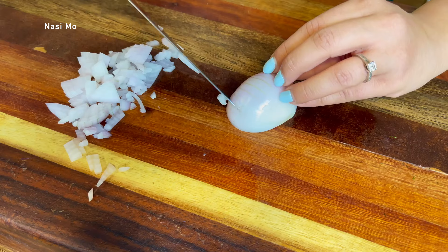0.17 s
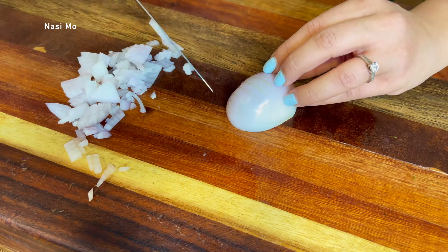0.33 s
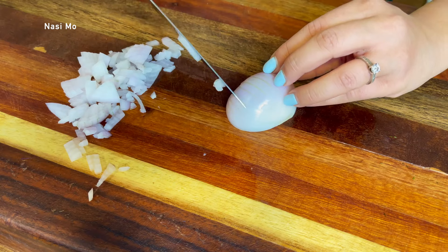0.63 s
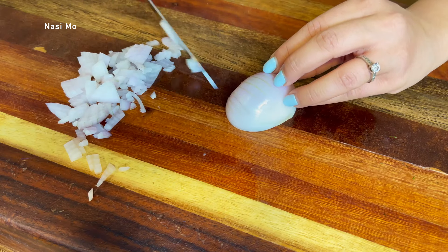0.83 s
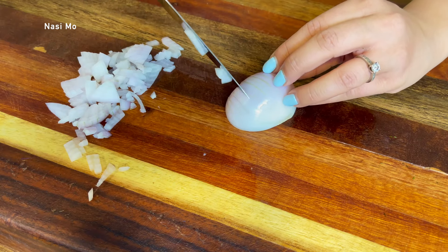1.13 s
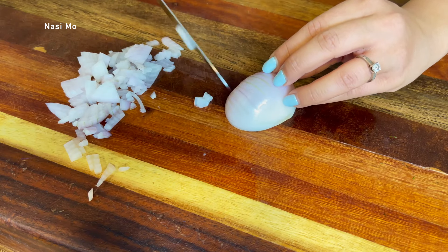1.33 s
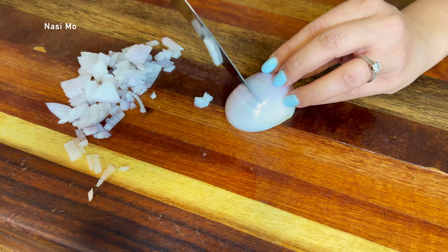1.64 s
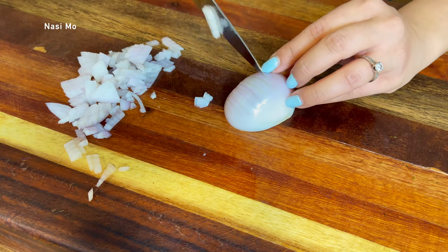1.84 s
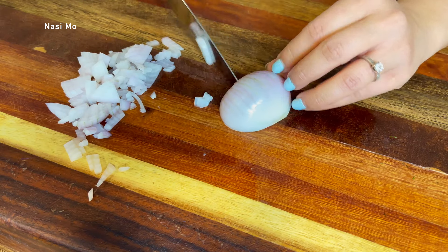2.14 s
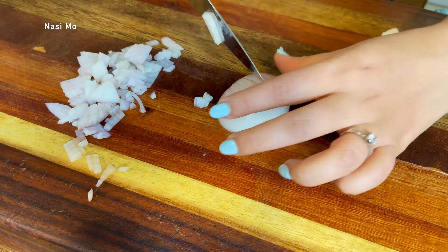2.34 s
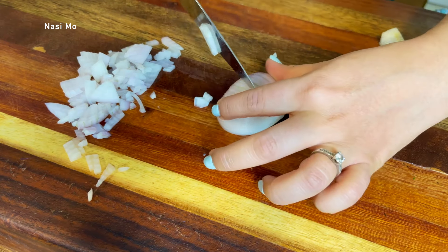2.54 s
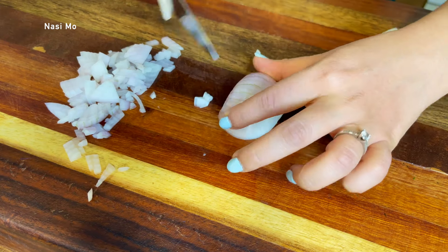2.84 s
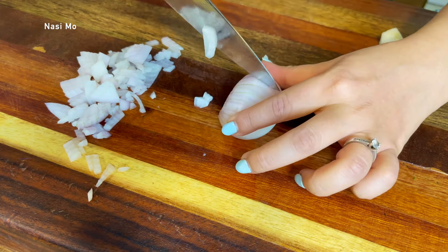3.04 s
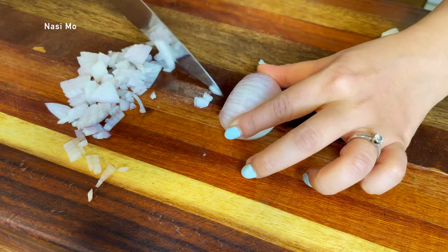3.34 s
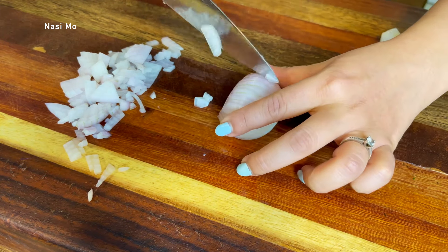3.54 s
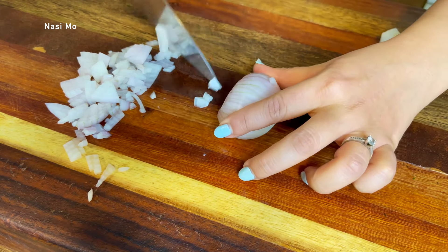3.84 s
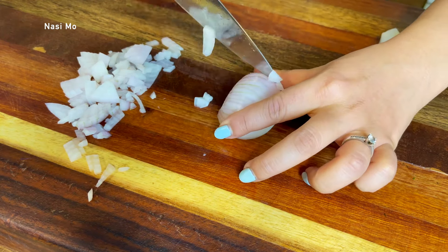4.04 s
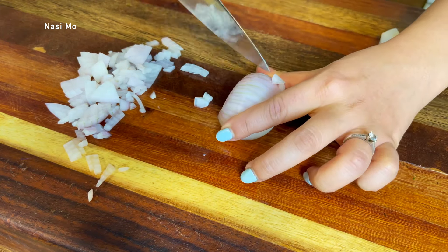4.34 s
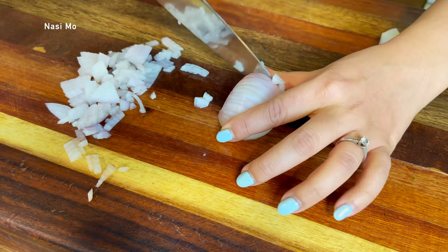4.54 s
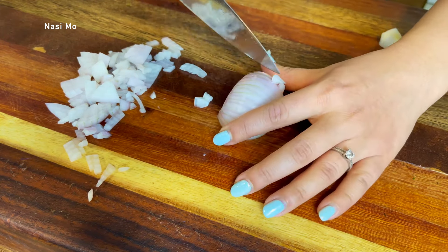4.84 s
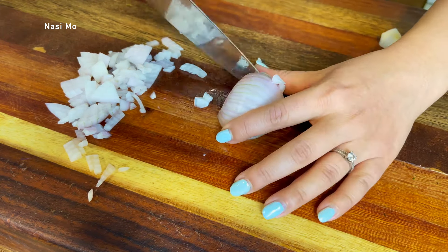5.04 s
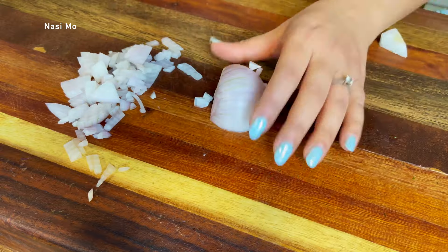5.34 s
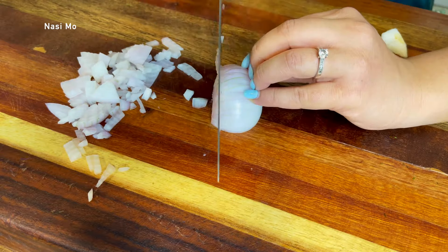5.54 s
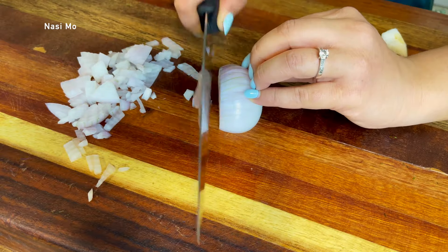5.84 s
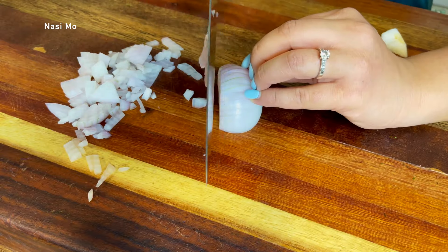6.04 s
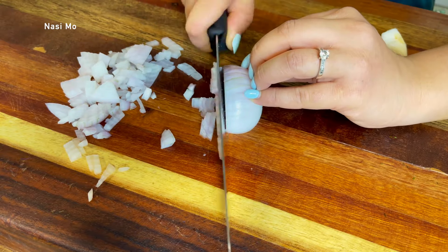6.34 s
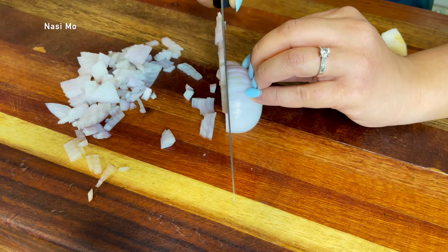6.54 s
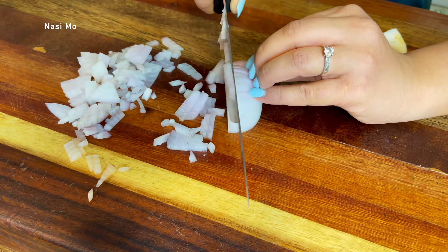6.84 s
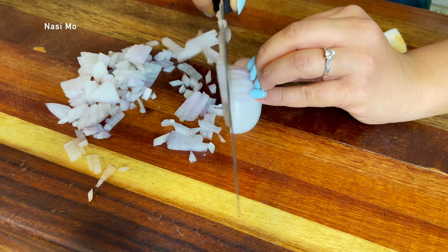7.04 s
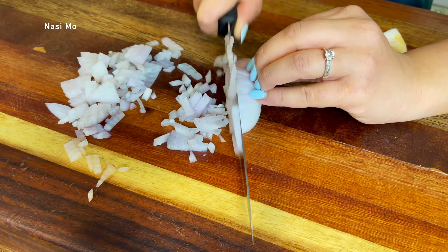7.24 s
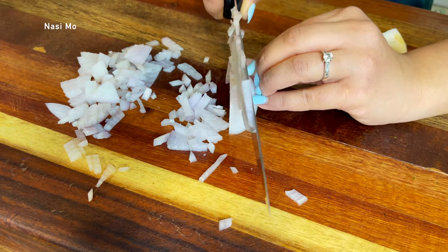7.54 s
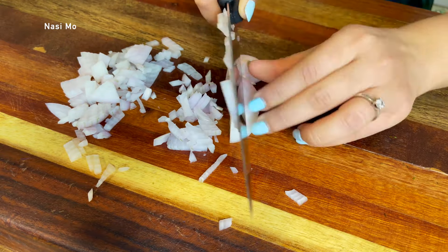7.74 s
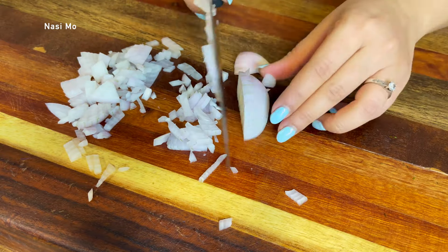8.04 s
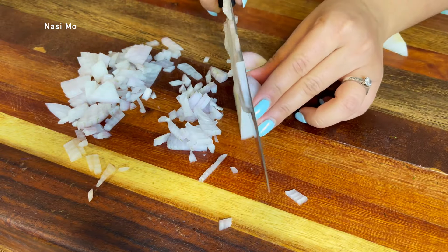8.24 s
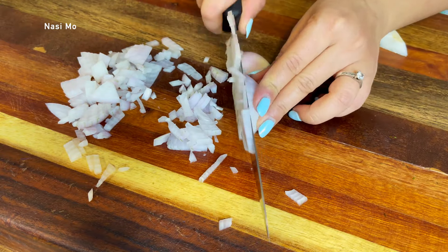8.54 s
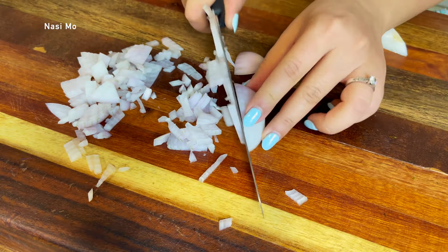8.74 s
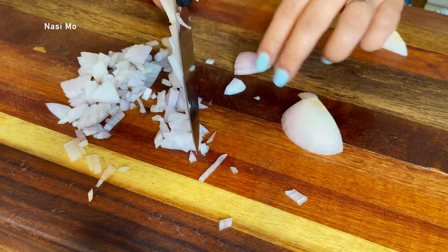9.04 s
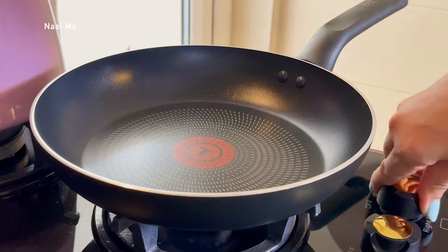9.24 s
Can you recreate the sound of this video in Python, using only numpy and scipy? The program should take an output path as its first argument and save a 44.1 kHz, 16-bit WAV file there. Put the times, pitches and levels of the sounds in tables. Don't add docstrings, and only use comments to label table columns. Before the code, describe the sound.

Very close to a wooden board in a home kitchen, a knife crunches through an onion and cracks onto the wood about every half second, with low counter thumps. After a short pause it dices in a quicker run, then slows to a few soft contacts. Finally a gas hob igniter snaps four times under a pan, with soft hissing gas.

```python
import sys
import numpy as np
from scipy import signal
from scipy.fft import rfft, irfft, next_fast_len
from scipy.io import wavfile
from scipy.ndimage import uniform_filter1d, map_coordinates

SR = 44100
rng = np.random.default_rng(int(sys.argv[2]) if len(sys.argv) > 2 else 0)


def dump(signal):
    limited = np.clip(np.atleast_2d(signal).T, -1, 1)
    pcm = np.round(limited * 32767).astype(np.int16)
    wavfile.write(sys.argv[1], SR, pcm)


def volts_from_decibels(level):
    exponent = np.asarray(level, float) / 20
    return 10 ** exponent


N = 414540

# start in seconds, peak, low knock, middle knock and crack in dB.
BLOWS = [(0.0776, -11, -4.5, -11, -7), (0.2473, -17.5, -5, -4.5, -9), (0.749, -16.5, -9.5, -4, -5.5),
         (1.271, -16.5, -6.5, -2.5, -8.5), (1.69, -14, -2.5, -9, -5.5), (2.0666, -8, -7.5, -14, -6),
         (2.7004, -15.5, -1, -4, -7.5), (3.239, -10, 3, -9, -8.5), (3.719, -18, 2, -5, -6),
         (4.161, -24, 7, -1, -4), (4.6219, -15.5, -3.5, -8.5, -6.5), (5.77, -20.5, -5, -7.5, -12),
         (6.2937, -20, -1, -7.5, -13), (6.6128, -12.5, -4, -14, -6), (6.924, -12.5, -5.5, -11.5, -13.5),
         (7.273, -13.5, -6, -20, -17.5), (8.5984, -19.5, -0.5, -10, -33)]
PLATE_DB = [0.5, -2.5, -0.5, -4.5, 1.5, 0, -0.5, 0, -12.5, -8, -4, -12, -7, -2, -1.5, 10.5, 5]
TAIL_DB = [1.6, 0.81, 1.3, .6, 0.78, 1.1, 1.3, 0.98, 1.4, 0.37, 0.16, 0.66, 0.14, 2.8, -1.1, -0.73, 1.2]
TOP_DB = [-6.5, 7, 10.5, 9, -3.5, -4.5, 3, -1.5, 0, 4, -4, -11, -17, -13, -10, -6, -3]
BITE_DB = [-1.5, -3, -.6, -0.4, 1.8, -2.5, 0.1, -0.7, 4.2, 2.5, -1, 1.7, 1.8, 0.5, -1, 0.85, 3.5]
DEEP_DB = [-0.3, 3.8, 8.5, -5, 1.5, -1.2, -1.3, -6.5, -7, -3, -8.2, 5, -6, 2.8, 7, 2.5, 1]
EDGE_KNOCK_DB = [-39, -59]

# pitch in Hz, level in dB, decay t60 in seconds.
LOW = [(196, -16, 0.17), (347.6, 3, 0.062), (375.5, 1.5, 0.063)]
# pitch in Hz, level in dB, t60 in seconds.
MIDDLE = [(575, -5, .035), (711, -11, .05), (892, -7, .05), (1426, -2, .14), (1680, -12, .06),
          (1803, -13, .08)]
# pitch in Hz, level in dB, t60 in seconds.
BRIGHT = [(2690, -5, .026), (2760, -3, .055), (2965, -1.5, .035), (3035, -16, .09), (3205, -12, .08),
          (3257, -14, .09), (3360, -11, .13), (3405, -14, .15), (3480, -13, .13), (3634, -12, .07),
          (3720, -13, .1), (4160, -22, .07), (4730, -24, .07), (5400, -30, .06)]
# pitch in Hz, level in dB, t60 in seconds.
EDGE = [(1000, -8, .04), (1144, -6, .12), (1176, 0, .12)]
# pitch in Hz, level in dB, t60 in seconds.
BETWEEN = [(920, -2, 0.032), (1800, -1.5, 0.02), (2110, -7, 0.027), (2330, -11, 0.094), (2640, -8.5, 0.022),
           (3880, -8.5, 0.066), (4364, -10, .03), (5410, -10, 0.013), (5660, -16.5, 0.036)]
PLATE_BEAT_HZ, PLATE_STEADY = 16.5, 0.32
CONTACT_S, DAMP_S, LEFT_DB = .0052, .0012, -8
TAIL_END_S, TAIL_END_DB = 0.172, -15.5

# frequency in Hz, level in dB per Hz.
ROOM_COLOUR = [(100, -12.5), (300, 0), (600, -9.5), (2000, -2), (3500, -1), (4200, -9), (6000, -1.5),
               (9000, -20), (16000, -28.5)]
# frequency in Hz, t60 in seconds.
ROOM_DECAY = [(200, 0.49), (1000, 0.21), (3000, 0.24), (7000, 0.12), (14000, 0.53)]

# start in seconds, then low, middle, edge and bright modes in dB.
RESTS = [
    (3.718, -44, -55, -33, -74.5),
    (4.163, -58, -44, -33.5, -77),
    (5.0467, -40.5, -64, -40, -48),
    (5.444, -94, -74, -82.5, -70.5),
    (5.77, -66, -61, -43, -70),
    (7.758, -46, -49, -65.5, -66),
    (8.442, -65, -47.5, -75, -75),
    (8.863, -53, -61, -81, -76),
]

# start in seconds, crunch in dB, rise in seconds,
# fall in seconds, board murmur in dB.
SCORING = [(.015, -42.5, 0.012, 0.016, -2.5), (0.059, -41.5, 0.0068, .2, 1.5),
           (.183, -43.5, 0.0052, 0.059, -6.5), (0.699, -60.5, 0.038, 0.051, -2.5),
           (0.746, -44.5, 0.021, .05, -2.5), (1.25, -56, 0.059, 0.084, -1), (1.266, -40, 0.0082, .05, -6),
           (1.64, -52, 0.011, 0.31, -1.5), (1.68, -53.5, 0.091, .1, -7), (2.0, -47, 0.017, 0.031, 2.5),
           (2.063, -45.5, 0.013, 0.081, 3), (2.677, -43, 0.018, 0.08, -1),
           (3.101, -60.5, 0.028, 0.082, 1.5), (3.154, -58.5, 0.079, 0.019, 4.5),
           (3.238, -47.5, 0.013, 0.094, -1.5), (3.654, -44.5, 0.022, 0.034, 0), (3.71, -56.5, 0.11, .1, -2),
           (4.108, -68.5, 0.024, 0.12, 5.5), (4.123, -52, 0.0068, 0.43, 3.5),
           (4.55, -55.5, 0.028, 0.22, -13), (4.575, -61, 0.093, 0.029, 8.5), (4.97, -65, 0.017, 0.13, -1),
           (5.006, -63, 0.0098, 0.2, 3.5), (5.035, -52, 0.081, 0.027, -6)]
# start in seconds, crunch in dB, rise and fall in seconds, murmur in dB.
DICING = [(5.729, -57.5, 0.031, 0.19, 3), (5.764, -43, 0.048, .1, -1), (6.26, -48, 0.025, 0.59, 1.5),
          (6.552, -55.5, 0.032, 0.061, 2), (6.607, -38, 0.031, 0.12, -8), (6.9, -39.5, 0.0067, 0.24, 1.5),
          (6.917, -46, 0.047, 0.11, -14), (7.201, -60.5, 0.029, 0.032, 6), (7.245, -42, 0.02, 0.083, -1),
          (8.442, -69.5, 0.013, 0.025, 16.5), (8.467, -75, 0.018, 0.035, 10),
          (8.482, -60.5, 0.024, 0.83, 1.5), (8.554, -55, 0.0051, 0.28, -3), (8.591, -64, 0.043, 0.13, -8)]
FINE_DB = [-.6, -0.24, -.6, 2.4, 1.5, 0.41, 1.7, -1.5, -1.5, -1.7, -1.5, -0.47, -0.57, -0.81, -1.4, -.6,
           -.6, -0.47, -0.16, -1.5, -1.5, 1.5, 1.8, 1.5, 0.48, 0.47, 1.2, -.6, 0.41, -0.42, -.6, -.6, -0.24,
           -0.49, -.6, -0.17, -0.31, -1.5]
# frequency in Hz, level in dB per Hz.
CRUNCH = [(1760, -40), (3000, -11.5), (3400, 4), (4630, 5), (6260, 4), (6810, -1), (10100, 0), (15000, 1.5),
          (16000, -23.5)]
BURST_DB, MURMUR_SWING, LOW_MURMUR_DB = 25.5, 0.78, 2.5
PATCHY_DB = 5
# pitch in Hz, level in dB, t60 in seconds.
CUT_MODES = [(1424, -0.5, 0.11), (1720, -10, .04), (1125, -13.5, 0.034)]
# frequency in Hz, level in dB per Hz.
FINE_MURMUR = [(1800, -31.5), (2600, 5.5), (3800, -8.0), (4500, -37.0)]

# start in seconds, peak in dB, board in dB.
TICKS = [(0.002, -57, -20), (0.496, -43.5, -26), (0.6432, -47.5, -29), (0.6879, -47, -34),
         (0.859, -39.5, -21), (1.2247, -51, -26), (1.365, -37, -15), (1.6325, -37, -32),
         (1.6591, -25.5, -27), (1.981, -37, -14), (2.8204, -37.5, -15.5), (3.1, -37.5, -29),
         (3, -56, -13.5), (3.7, -49, -26.5), (3.637, -34, -14), (4.2588, -33, -20), (4.544, -37, -27),
         (4.709, -35.5, -34), (4.907, -51, -28.5), (4.968, -49, -16), (4.987, -48, -32), (5.005, -45, -31),
         (5.0241, -52, -33), (5.046, -31, -18), (5.1935, -39, -34), (5.7157, -48.5, -26.5),
         (5.9659, -57, -7.5), (5.993, -54, -28.5), (6.499, -48, -5.5), (6.68, -51, -29),
         (6.815, -40, -11.5), (6.845, -39, -20), (7.202, -44, -25), (7.519, -41, -22), (7.81, -64, -29),
         (8.439, -43.5, -13.5), (8.462, -44, -25.5), (8.554, -33, -26), (8.567, -42, -25),
         (8.815, -54.5, -5.5), (8.867, -61, 1)]
# start in seconds, low modes in dB, deepest mode in dB.
NUDGES = [(0.02, -31, -37), (0.081, -44, -21.5), (0.194, -52, -50), (1.514, -49.5, -71.5), (1.64, -45, -58),
          (1.902, -49, -71), (1.986, -46, -60), (2.684, -34.5, -58), (3.024, -34, -64), (3.136, -57, -66),
          (3.337, -38, -63), (3.557, -43, -71.5), (3.641, -27, -61), (3.817, -35, -68.5), (3.995, -38, -64),
          (4.124, -30, -53), (4.257, -34, -45), (4.552, -33, -62), (4.712, -38, -63.5), (5.198, -40, -78.5),
          (5.727, -37.5, -57), (5.97, -43.5, -60), (6.267, -42.5, -54), (6.899, -37, -51),
          (7.003, -51, -62), (7.683, -45, -77), (8.442, -41, -28.5), (8.464, -33, -27.5)]
# start in seconds, pitch in Hz, level in dB, t60 in seconds.
FAINT = [(5.436, 1860, -78, 0.22), (5.44, 2646, -68, 0.23), (5.452, 2290, -76.5, 0.26),
         (5.46, 3300, -79, 0.13), (7.59, 3190, -72.5, 0.095), (7.78, 1424, -71.5, 0.91),
         (7.8, 2815, -70, 0.16), (5.63, 300, -70, 0.53), (5.63, 620, -76.5, 0.37), (7.87, 2900, -75.5, 0.4),
         (8.005, 765, -83.5, 0.46), (8.155, 300, -71.5, 0.28), (8.255, 740, -81.5, 0.64),
         (8.868, 1420, -61, 0.065), (8.88, 201, -60, 0.21)]
# start in seconds, pitch in Hz, level in dB, t60 in seconds.
BLIPS = [
    (8.438, 3040, -57.5, .03),
    (8.441, 5400, -69, .03),
    (8.771, 3000, -52, .025),
    (8.812, 5500, -61, .04),
    (8.865, 2860, -51, .015),
    (9.117, 5440, -59.5, .04),
    (9.13, 5370, -52, .05),
]

# start in seconds, level in dB, pitch in Hz, hold in seconds.
JOLTS = [(0.082, -23, 66.64, 0.041), (0.243, -33, 68.33, 0.021), (0.757, -23, 65.92, 0.051),
         (1.283, -23, 67.48, 0.046), (1.699, -23.5, 66.27, 0.039), (2.089, -18.5, 65.62, 0.022),
         (2.702, -27, 67.05, 0.048), (3.26, -17.5, 68.09, 0.033), (3.728, -18.5, 66.77, 0.022),
         (4.164, -24.5, 74.42, 0.047), (4.622, -28.5, 71.67, 0.018), (5.058, -25.5, 65.1, 0.018),
         (5.82, -24.5, 70.1, 0.016), (6.317, -23, 70.4, 0.025), (6.627, -26, 74.03, 0.032),
         (6.918, -22.5, 69.55, 0.018), (7.277, -30.5, 74.4, 0.021), (8.592, -30.5, 70.5, 0.0066)]
# start in seconds, level in dB, pitch in Hz, hold in seconds.
LEANS = [(0, -30, 70, .002), (0.053, -26.5, 68.83, 0.0093), (1.082, -55, 69.83, 0.037),
         (1.556, -44.5, 68.4, 0.0054), (1.667, -26, 69.2, 0.0066), (1.841, -43, 66.56, 0.1),
         (2.014, -23.5, 67.12, 0.029), (2.688, -32, 66, 0.0082), (3.029, -48.5, 72.53, 0.015),
         (3.116, -31, 71.5, 0.07), (3.572, -45.5, 76.7, 0.015), (3.672, -23.5, 69.4, 0.038),
         (3.799, -28.5, 69.1, 0.033), (4.0, -45, 80, 0.025), (4.141, -31.5, 75.23, 0.0051),
         (4.569, -30, 72.35, 0.084), (4.83, -54, 69.22, 0.079), (5.52, -48.5, 77.3, 0.0096),
         (5.62, -41, 82.9, 0.014), (5.742, -22, 75.4, 0.0058), (5.998, -44, 85.85, 0.043),
         (6.131, -46.5, 82.2, .01), (6.513, -27, 73.66, 0.022), (6.829, -32, 74.1, 0.052),
         (7.14, -27, 69, 0.0051), (7.21, -40, 68.7, 0.0088), (7.5, -38, 72.4, 0.12),
         (8.226, -48, 79.5, 0.0097), (8.472, -30.5, 86.2, 0.0073), (8.779, -51.5, 76.2, 0.019)]
SWELL_DB_PER_S, DROP_DB_PER_S, LINGER_DB, LINGER_DB_PER_S = 897, 330.5, -18.5, 91.5
LIFT_S, LIFT_DB, LIFT_HOLD_S = 0.1, -17.5, 0.063
CREST_S, RESET_S = .0255, .014
# pitch in Hz, level in dB, t60 in seconds.
FLUTTER = [(92, 0, .09), (120, -5, .09)]

HOB_S = 9.11
# start in seconds, peak in dB.
SPARKS = [
    (9.152, -18),
    (9.2195, -17),
    (9.287, -17),
    (9.3536, -17.5),
]
# delay in seconds, level in dB.
SPARK_ECHOES = [
    (.0017, 0),
    (.0062, -5.5),
]
# frequency in Hz, level in dB per Hz.
SPARK_COLOUR = [(400, -69), (600, -17), (850, -63), (1190, -17), (1700, -51), (2200, -20), (4000, -17.5),
                (6400, -8), (7900, -15.5), (9900, 1.5), (13300, -2), (16000, -5)]
# pitch in Hz, level in dB, t60 in seconds.
SNAP = [(6000, -11, 0.0083), (6690, -7.5, 0.0095), (8200, -8.0, 0.0049), (10150, -2.5, 0.0057),
        (13300, 8, 0.0027)]
# frequency in Hz, t60 in seconds.
PAN_DECAY = [(500, 0.27), (3000, 0.174), (15000, 0.045)]
# pitch in Hz, level in dB, t60 in seconds.
PAN = [(603, -37, 0.27), (1165, -18, 0.027), (1850, -37.5, 0.14), (2180, -29.5, 0.078), (2720, -23, 0.041),
       (3100, -25, 0.074), (3830, -29, 0.15), (4440, -20, 0.051), (4460, -27, 0.05)]
# time in seconds, hob rumble in dB, gas in dB.
GAS = [
    (9.112, -78, -93.5),
    (9.119, -52, -71),
    (9.18, -47.5, -56),
    (9.195, -56, -60),
    (9.24, -59.5, -59),
    (9.4, -74, -58),
]
# pitch in Hz, level in dB, t60 in seconds.
HOB_MODES = [(201, -4.0, 0.057), (241.4, -4.0, 0.09)]

# frequency in Hz, level in dB per Hz.
HUM = [(45, -34), (80, 13.5), (150, -11.5), (183, -32.5), (296, -2), (403, -5.5), (567, -39), (627, -19.5),
       (874, -17.5), (950, -25), (1240, -46), (2090, -120)]
# frequency in Hz, level in dB per Hz.
HISS = [(500, -44), (700, -13.5), (2000, -1.5), (3500, -6), (4200, -8), (5500, -5.5), (6500, -38)]
HUM_DB, HISS_DB = -54, -70.5
# pitch in Hz, level in dB, t60 in seconds.
HISS_PLATE = [(1424, -2.0, 0.7), (1110, -7.0, 0.075), (1680, -11.0, .3)]

SOFT_OPEN_DB, LIGHT_OPEN_DB, TAP_OPEN_DB = -24, -34, -49
SAG_DB_PER_S, OPEN_S, OPEN_S_PER_DB, SHUT_DB_PER_S = 13, .6, .014, 72
# frequency in Hz, level in dB.
GATE = [(70, -71), (140, -94.5), (400, -100), (1500, -108), (2200, -99.5), (2900, -110), (4500, -102),
        (8000, -102), (15000, -108)]


def unit(x):
    return x / np.sqrt(np.mean(x ** 2) + 1e-20)


def along(points, hz):
    f, v = np.transpose(points)
    return np.interp(np.log(hz + 1), np.log(f + 1), v)


def curves(rows):
    s, *cols = np.transpose(rows)
    t = np.arange(N) / SR
    return [np.interp(t, s, c) for c in cols] + [(t >= s[0]) & (t <= s[-1])]


def wobble(rate):
    knots = rng.standard_normal(int(N * rate / SR) + 4)
    return map_coordinates(knots, [np.arange(N) * rate / SR])


def coloured(x, gain):
    m = next_fast_len(len(x) + 8192)
    return unit(irfft(rfft(x, m) * gain(np.fft.rfftfreq(m, 1 / SR)), m)[:len(x)])


def add(track, s, sound):
    part = track[round(s * SR):][:len(sound)]
    part += sound[:len(part)]


def resonant(modes):
    def response(f):
        total = 0
        for k, (hz, db, t60) in enumerate(modes):
            damping = 1j * f * np.log(1000) / np.pi / t60
            total = total + (-1) ** k * volts_from_decibels(db) * damping / (hz * hz - f * f + damping)
        return total
    return response


def woody(spectrum, between):
    bumps = resonant([(hz, 0, .09) for hz, _, _ in LOW + EDGE + MIDDLE + BRIGHT])
    plate = resonant([(1424, 7, .06)])
    return lambda f: volts_from_decibels(along(spectrum, f)) * (between + np.abs(bumps(f)) + np.abs(plate(f)))


def ring(modes, t, attack, signs=(1,)):
    total = 0
    for hz, db, t60 in modes:
        fall = volts_from_decibels(db + rng.normal(0, 2) - 60 * t / t60)
        total = total + fall * np.sin(2 * np.pi * hz * t) * rng.choice(signs)
    return total * (1 - np.exp(-(t / attack) ** 2))


def beating(t):
    return PLATE_STEADY + (1 - PLATE_STEADY) * np.cos(np.pi * PLATE_BEAT_HZ * t)


def echoes(colour, decays, late_db):
    noise = coloured(rng.standard_normal(SR // 2), colour)
    hz, t, z = signal.stft(noise, SR, nperseg=256)
    fall = -60 * t / along(decays, hz)[:, None]
    wash = late_db + 0.6 * fall
    return signal.istft(z * (volts_from_decibels(fall) + volts_from_decibels(wash)), SR, nperseg=256)[1][:SR // 2]


def struck_board(t, blow, plate_db, bite_db, deep_db):
    s, db, low_db, middle_db, _ = blow
    held = 1 / (1 + np.exp(np.clip((t - CONTACT_S) / DAMP_S, -30, 30)))
    bite = volts_from_decibels(LEFT_DB) + held * volts_from_decibels(2.0 + 340 * np.minimum(t, CONTACT_S))
    bitten = ring(BRIGHT[:2], t, .0005) - ring(BRIGHT[2:3], t, .0005)
    wood = volts_from_decibels(bite_db - 8.0) * bite * bitten
    wood += volts_from_decibels(-9.0) * ring(BRIGHT[3:], t, 0.0008, signs=(-1, 1))
    wood += volts_from_decibels(-14.0) * ring(BETWEEN, t, 0.0011, signs=(-1, 1))
    plate = volts_from_decibels(plate_db + 1.5) * beating(t) * ring(MIDDLE[3:4], t, 0.0029)
    wood += volts_from_decibels(middle_db) * (ring(MIDDLE[:3] + MIDDLE[4:], t, 0.0028) + plate)
    dicing = int(s > DICING[0][0])
    wood += volts_from_decibels(EDGE_KNOCK_DB[dicing] - db) * ring(EDGE, t, 0.006)
    deepest = volts_from_decibels(deep_db) * ring(LOW[:1], t, 0.0054)
    wood += volts_from_decibels(low_db + 0.5) * (deepest + ring(LOW[1:], t, 0.0085))
    return wood


def edge_crack(t, crack_db, top_db):
    def colour(f):
        return volts_from_decibels(along(CRUNCH, f) + top_db / (1 + (7000 / (f + 1)) ** 4))
    puff = coloured(rng.standard_normal(len(t)), colour)
    return volts_from_decibels(crack_db - 3) * puff * (volts_from_decibels(-60 * t / .012) + .12 * volts_from_decibels(-60 * t / .075))


def chops():
    out, t = np.zeros(N), np.arange(SR // 5) / SR
    colour = woody(ROOM_COLOUR, 0.3)
    onset = 1 - np.exp(-np.arange(SR // 2) / SR / 0.00074)
    per_blow = zip(BLOWS, PLATE_DB, TAIL_DB, TOP_DB, BITE_DB, DEEP_DB)
    for blow, plate_db, tail_db, top_db, bite_db, deep_db in per_blow:
        s, db, _, _, crack_db = blow
        wood = struck_board(t, blow, plate_db, bite_db, deep_db)
        add(out, s, volts_from_decibels(db) * (wood + edge_crack(t, crack_db, top_db)))
        room = volts_from_decibels(-19.5) * echoes(colour, ROOM_DECAY, late_db=-25.5)
        add(out, s, volts_from_decibels(db + tail_db) * onset * room)
    out[round(TAIL_END_S * SR):round(BLOWS[1][0] * SR)] *= volts_from_decibels(TAIL_END_DB)
    for s, low_db, middle_db, edge_db, bright_db in RESTS:
        rest = volts_from_decibels(low_db) * ring(LOW[1:], t, 0.0036)
        rest += volts_from_decibels(middle_db) * beating(t) * ring(MIDDLE, t, 0.0036)
        rest += volts_from_decibels(edge_db) * ring(EDGE, t, 0.0036)
        rest += volts_from_decibels(bright_db) * ring(BRIGHT, t, 0.0036)
        add(out, s, rest)
    return out


def cells():
    sizes = volts_from_decibels(3.6 * rng.exponential(size=N)) * (rng.random(N) < .04)
    grains = unit(sizes * rng.standard_normal(N))
    return (grains + .9 * rng.standard_normal(N)) * volts_from_decibels(2.5 * wobble(180))


def patchy(x):
    z = signal.stft(x, nperseg=256)[2]
    field = uniform_filter1d(rng.standard_normal(z.shape), size=10, axis=0)
    field = uniform_filter1d(field, size=8, axis=1)
    return unit(signal.istft(z * volts_from_decibels(PATCHY_DB * unit(field)), nperseg=256)[1][:N])


def slices():
    def split(f):
        return 1 / (1 + (f / 7000) ** 4)
    coarse, fine = patchy(cells()), patchy(cells())
    lumps = volts_from_decibels(2 * wobble(45)) * coarse
    crunch = 0.52 * coloured(coarse, lambda f: volts_from_decibels(along(CRUNCH, f)) * split(f))
    crackle = coloured(fine, lambda f: volts_from_decibels(along(CRUNCH, f)) * (1 - split(f)))
    board = coloured(lumps, resonant(CUT_MODES)) + 0.38 * coloured(fine, woody(FINE_MURMUR, 0.083))
    low = coloured(lumps, resonant(LOW[1:])) + 0.35 * coloured(fine, resonant(LOW[:1]))
    out = np.zeros(N)
    blows = np.array([row[0] for row in BLOWS])
    for (s, db, rise, fall, murmur_db), fine_db in zip(SCORING + DICING, FINE_DB):
        end = min(s + 2 * fall, blows[blows > s][0])
        i = np.arange(max(round((s - rise) * SR), 0), round(end * SR))
        shape_db = -BURST_DB * np.maximum((s - i / SR) / rise, (i / SR - s) / fall)
        tearing = volts_from_decibels(shape_db) * (crunch[i] + volts_from_decibels(fine_db) * crackle[i])
        murmur = volts_from_decibels(murmur_db + MURMUR_SWING * shape_db) * (board[i] + volts_from_decibels(LOW_MURMUR_DB) * low[i])
        soft_start = np.minimum(1, (i - i[0]) / 200)
        out[i] += soft_start * volts_from_decibels(db) * (tearing + murmur)
    return out


def ticks():
    out, t = np.zeros(N), np.arange(SR // 10) / SR
    for s, db, knock_db in TICKS:
        bumps_db = 5 * rng.standard_normal(14)
        puff = coloured(rng.standard_normal(len(t)),
                        lambda f: volts_from_decibels(np.interp(f, np.linspace(1500, 16000, 14), bumps_db)))
        snap = .4 * puff * volts_from_decibels(-60 * t / .025) * (1 - np.exp(-t / .001))
        knock = volts_from_decibels(knock_db) * beating(t) * ring(MIDDLE, t, 0.0015)
        add(out, s, volts_from_decibels(db - 0.5) * (snap + knock))
    for s, db, deep_db in NUDGES:
        add(out, s, volts_from_decibels(db + 3.0) * ring(LOW[1:], t, 0.011))
        add(out, s, volts_from_decibels(deep_db + 13.0) * ring(LOW[:1], t, 0.0068))
    return out


def faint():
    out, t = np.zeros(N), np.arange(SR // 3) / SR
    fade = np.cos(t / t[-1] * np.pi / 2)
    for s, hz, db, t60 in FAINT:
        add(out, s, volts_from_decibels(db) * ring([(hz, 0, t60)], t, 0.0039) * fade)
    out *= .8 * wobble(45)
    for s, hz, db, t60 in BLIPS:
        add(out, s, volts_from_decibels(db) * ring([(hz, 0, t60), (1.04 * hz, -3, t60)], t, .0015))
    return out


def counter():
    lifts = [(s + LIFT_S, db + LIFT_DB, hz, LIFT_HOLD_S) for s, db, hz, _ in JOLTS]
    s, db, hz, hold = np.transpose(JOLTS + LEANS + lifts)[:, :, None]
    ms, t = np.arange(0, N / SR, 1 / 1000), np.arange(N) / SR
    after = np.maximum(ms - s - hold, 0)
    fall = volts_from_decibels(-DROP_DB_PER_S * after) + volts_from_decibels(LINGER_DB - LINGER_DB_PER_S * after)
    fall = fall / (1 + volts_from_decibels(LINGER_DB))
    each = volts_from_decibels(db - SWELL_DB_PER_S * np.maximum(s - ms, 0)) * fall
    size = uniform_filter1d(np.sqrt(np.sum(each ** 2, axis=0)), size=8)
    size = uniform_filter1d(size, size=8)
    pitch = uniform_filter1d(hz[np.argmax(each, axis=0), 0], size=15)
    turn = 2 * np.pi * np.cumsum(np.interp(t, ms, pitch) * (1 + 0.03 * wobble(21))) / SR
    blows = np.array([row[0] for row in BLOWS])
    crests = np.round((blows + CREST_S) * SR).astype(int)
    shift = np.unwrap(np.pi / 2 - turn[crests] % (2 * np.pi))
    knots_s = np.ravel([blows, blows + RESET_S], "F")
    knots = np.ravel([np.r_[shift[0], shift[:-1]], shift], "F")
    turn = turn + np.interp(t, knots_s, knots)
    flutter = coloured(rng.standard_normal(N), lambda f: resonant(FLUTTER)(f) / (1 + (f / 170) ** 6))
    level = uniform_filter1d(np.interp(t, ms, size * (ms < HOB_S)), size=88) * volts_from_decibels(0.45 * wobble(30))
    return level * (np.sqrt(2) * np.sin(turn) + volts_from_decibels(-14.5) * flutter)


def hob():
    out, t = np.zeros(N), np.arange(SR // 2) / SR

    def colour(f):
        return volts_from_decibels(along(SPARK_COLOUR, f))
    for s, db in SPARKS:
        snap = ring(SNAP, t, 0.00029)
        add(out, s, volts_from_decibels(db - 10.0) * ring(PAN, t, 0.0031))
        for delay, echo_db in SPARK_ECHOES:
            add(out, s + delay, volts_from_decibels(db - 2.5 + echo_db) * snap)
        tail = volts_from_decibels(-17.0) * echoes(colour, PAN_DECAY, late_db=-7.0)
        add(out, s, volts_from_decibels(db) * (0.61 * snap + tail))
    rumble_db, gas_db, on = curves(GAS)
    rumble = coloured(rng.standard_normal(N), resonant(HOB_MODES))
    gas = coloured(rng.standard_normal(N), colour)
    return out + on * (volts_from_decibels(rumble_db) * rumble + volts_from_decibels(gas_db) * gas)


def suppressor():
    opens = [row[:2] for row in BLOWS]
    opens += [(row[0], SOFT_OPEN_DB) for row in SCORING[:-3] + DICING]
    opens += [(row[0], LIGHT_OPEN_DB) for row in SCORING[-3:]]
    opens += [(RESTS[5][0], TAP_OPEN_DB)]
    s, db = np.transpose(opens)[:, :, None]
    ms = np.arange(0, N / SR, 1 / 1000)
    since = ms - s
    overdue = np.maximum(since - OPEN_S - OPEN_S_PER_DB * db, 0)
    each = np.maximum(-SAG_DB_PER_S * since - SHUT_DB_PER_S * overdue, -60)
    gain_db = np.max(np.where((since > 0) & (ms < HOB_S), each, -60), axis=0)
    return np.interp(np.arange(N) / SR, ms, uniform_filter1d(gain_db, size=20))


def kitchen():
    open_db = suppressor()
    hum = coloured(rng.standard_normal(N), lambda f: volts_from_decibels(along(HUM, f)))
    hiss = coloured(rng.standard_normal(N), woody(HISS, .4))
    plate = coloured(rng.standard_normal(N), resonant(HISS_PLATE))
    hiss += 0.38 * volts_from_decibels(3.7 * wobble(32)) * plate
    return volts_from_decibels(open_db) * (volts_from_decibels(HUM_DB + 1.5 * wobble(4.8)) * hum + volts_from_decibels(HISS_DB + wobble(1.3)) * hiss)


def air():
    _, t, z = signal.stft(rng.standard_normal(N), SR, nperseg=512)
    opens = np.sort([row[0] for row in SCORING + DICING + BLOWS])
    since = t - opens[np.maximum(np.searchsorted(opens, t) - 1, 0)]
    ragged = uniform_filter1d(rng.standard_normal(z.shape), size=5, axis=0)
    ragged = uniform_filter1d(ragged, size=40, axis=1)
    shut = np.clip((since - .33 - .06 * unit(ragged)) / .03, -30, 30)
    hiss = signal.istft(z * volts_from_decibels(-22 * since) / (1 + np.exp(shut)), SR, nperseg=512)[1][:N]
    return volts_from_decibels(-67.0) * (hiss - uniform_filter1d(hiss, size=9))


def scene():
    board = chops() + slices() + ticks() + faint()
    return (board + counter() + hob() + kitchen() + air())[None]


def gated(x):
    hz, _, z = signal.stft(x, SR, nperseg=1024)
    power = uniform_filter1d(np.abs(z) ** 2, size=3, axis=1)
    power = uniform_filter1d(power, size=5, axis=2)
    edge = volts_from_decibels(2 * along(GATE, hz))[:, None]
    return signal.istft(z * power / (np.abs(power) + edge), SR, nperseg=1024)[1][:, :N]


def top_cut(x):
    return signal.sosfilt(signal.butter(12, 16840, fs=SR, output="sos"), x)


def record(dry):
    cut = signal.sosfiltfilt(signal.butter(4, 47, "high", fs=SR, output="sos"), dry)
    cut = signal.sosfilt(signal.cheby2(10, 40, 16300, fs=SR, output="sos"), cut)
    cut = gated(cut)
    soft = cut / (1 + np.abs(cut / .33) ** 4) ** (1 / 4)
    return top_cut(soft)


dry = scene()
out = record(dry)
dump(out)
```